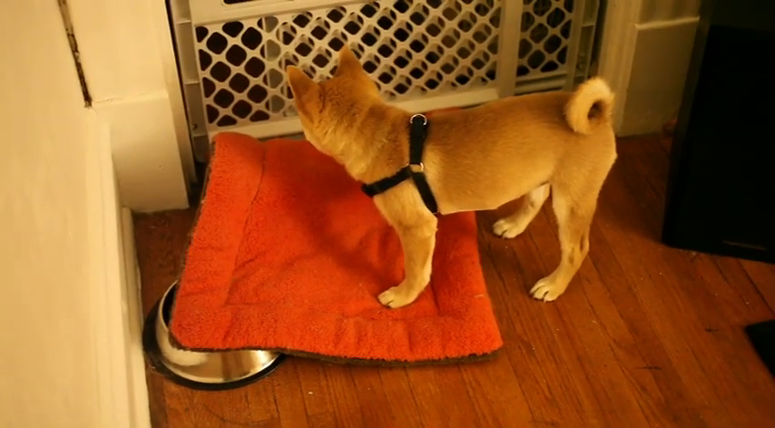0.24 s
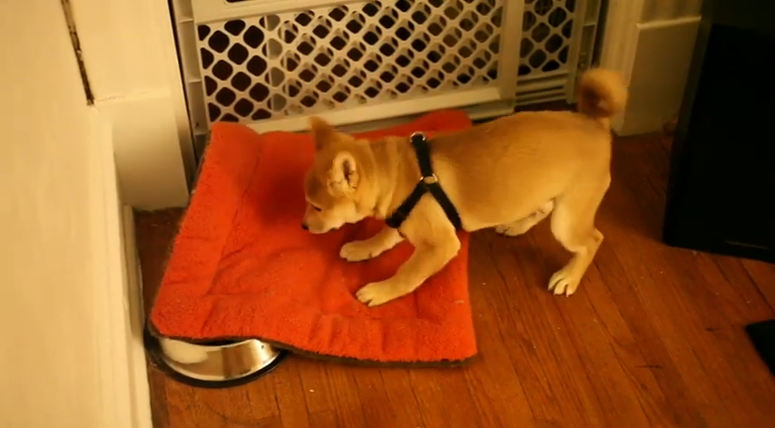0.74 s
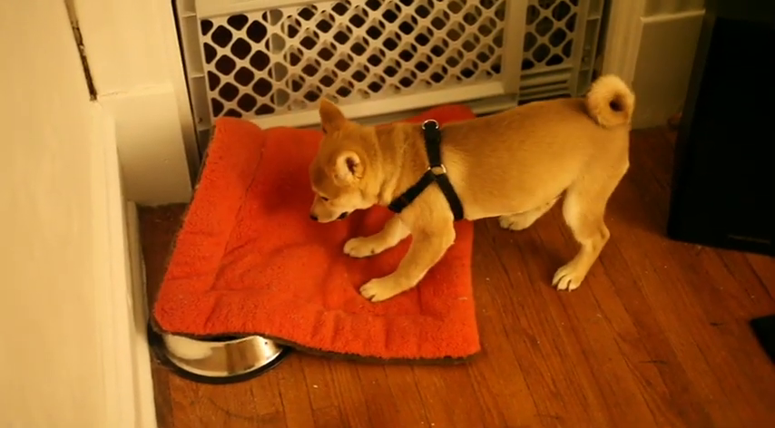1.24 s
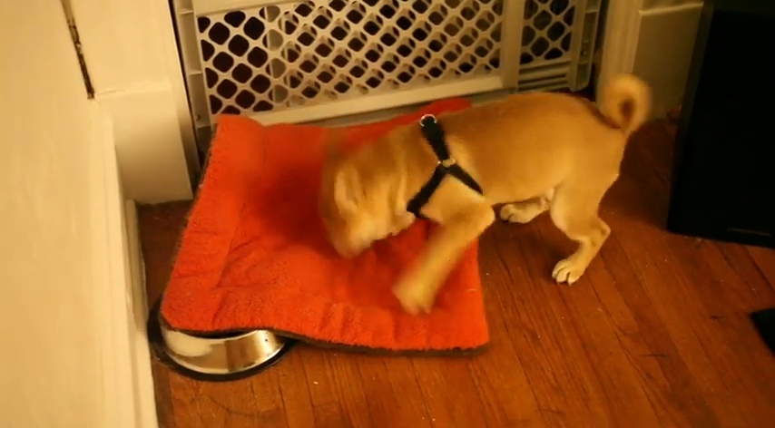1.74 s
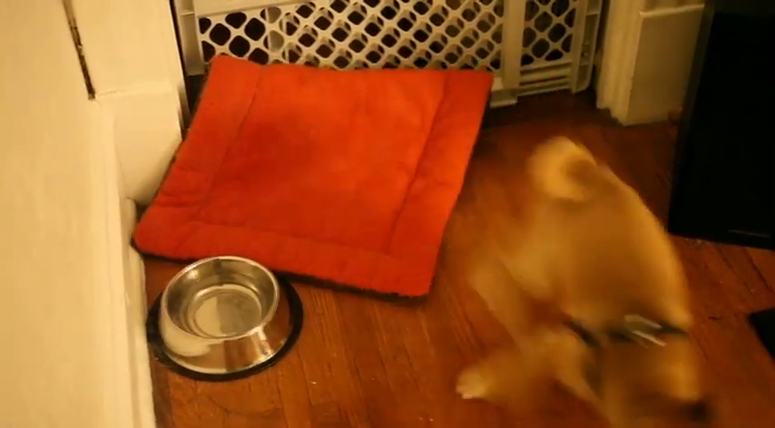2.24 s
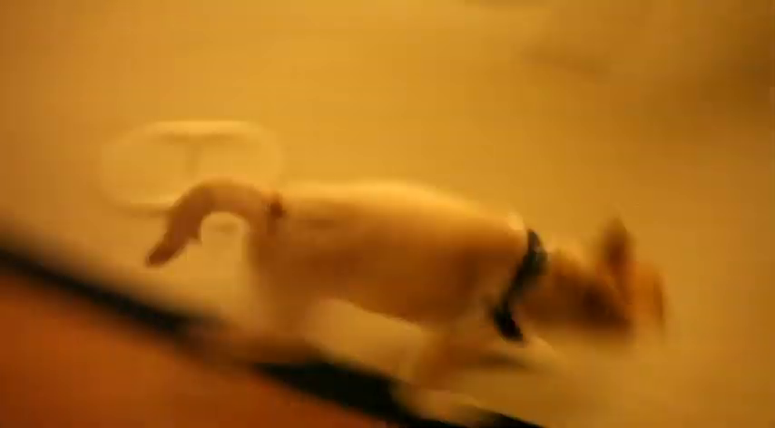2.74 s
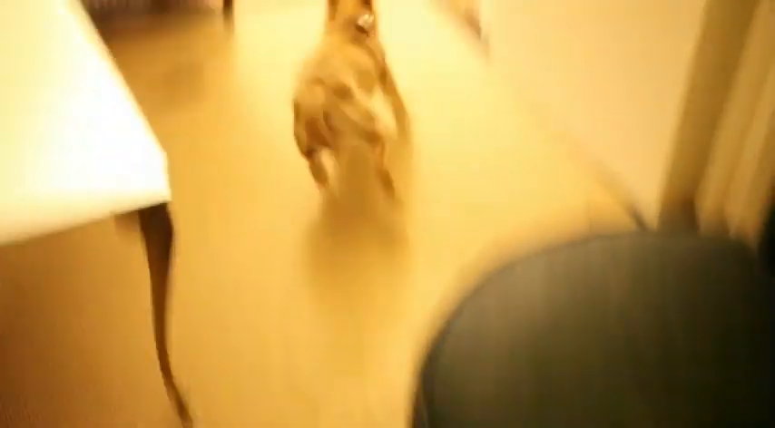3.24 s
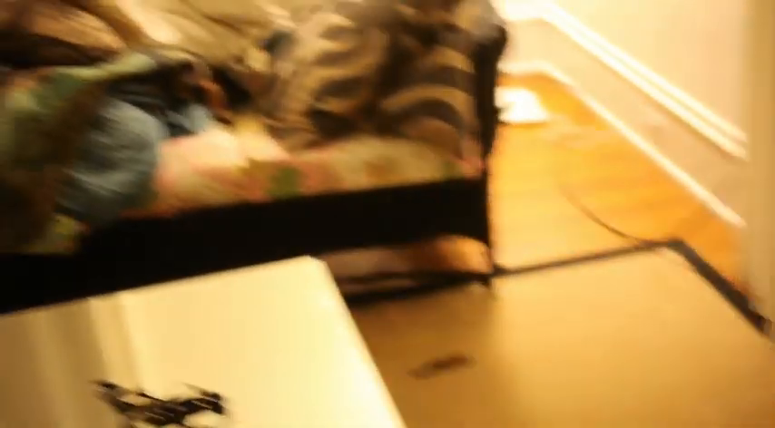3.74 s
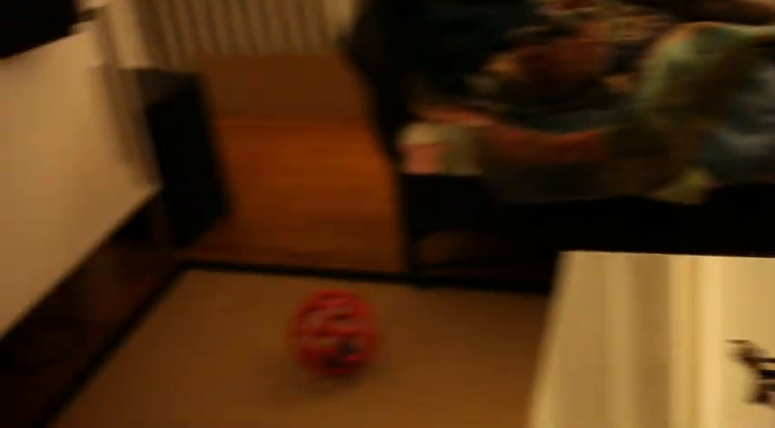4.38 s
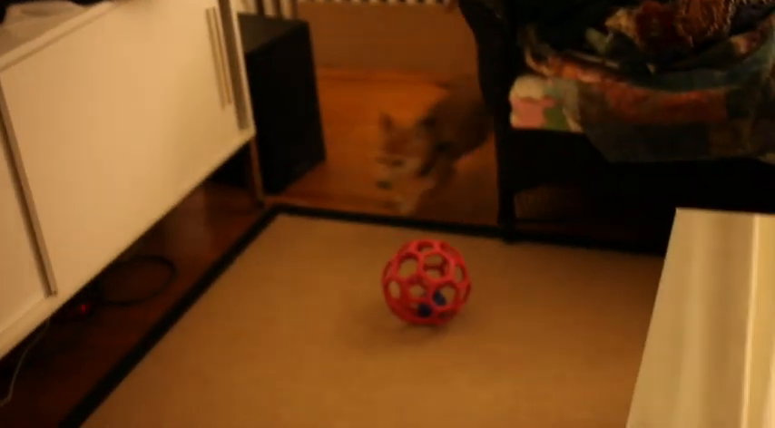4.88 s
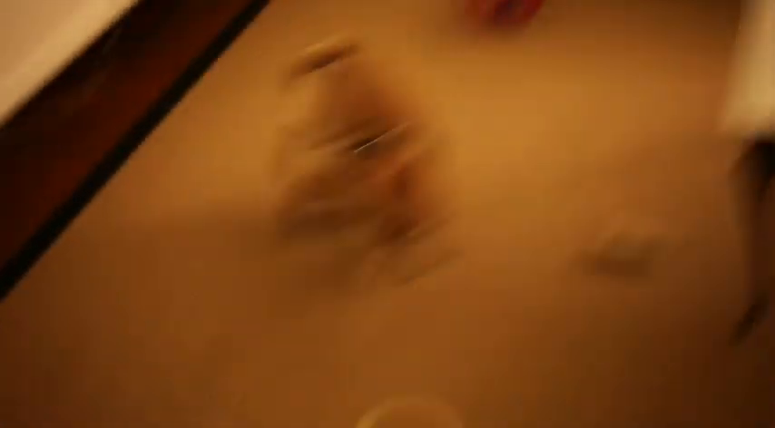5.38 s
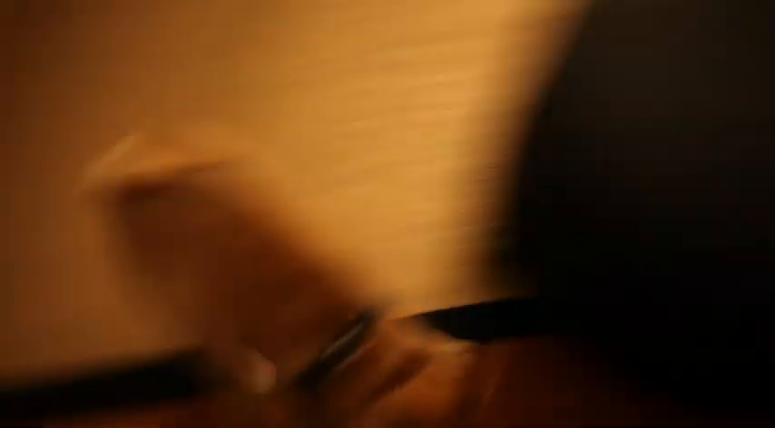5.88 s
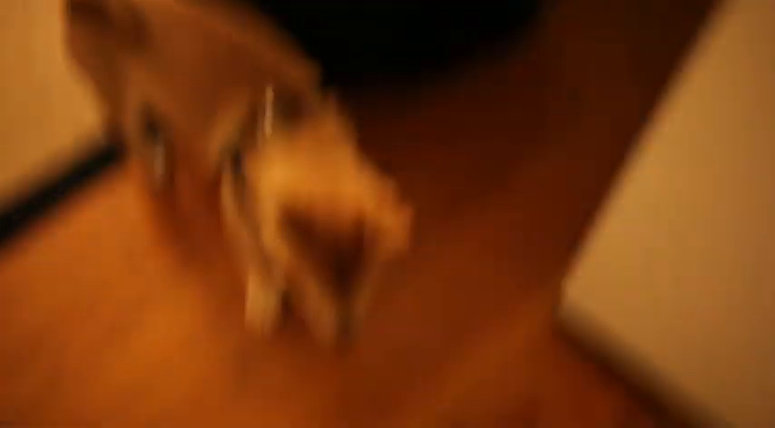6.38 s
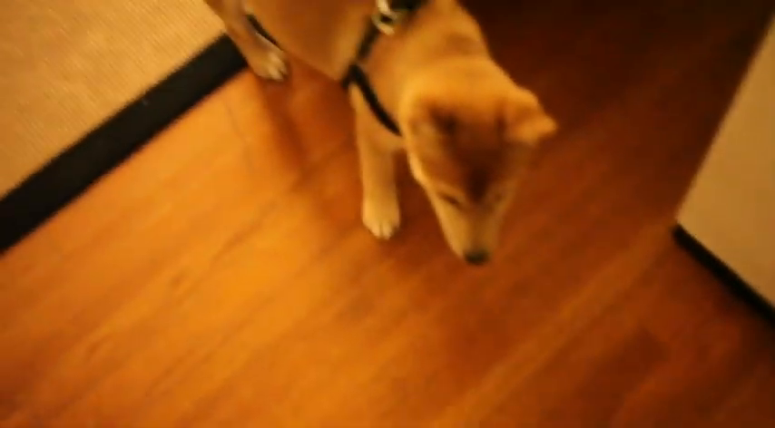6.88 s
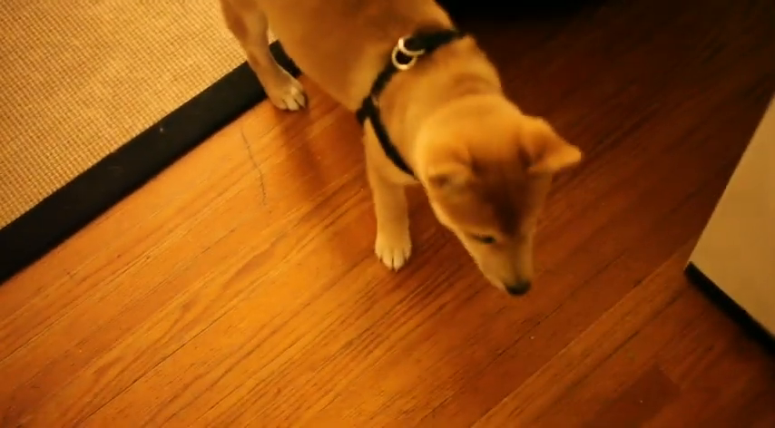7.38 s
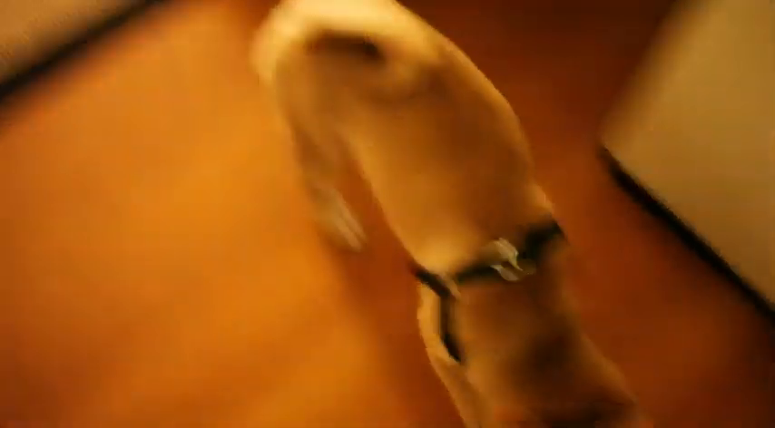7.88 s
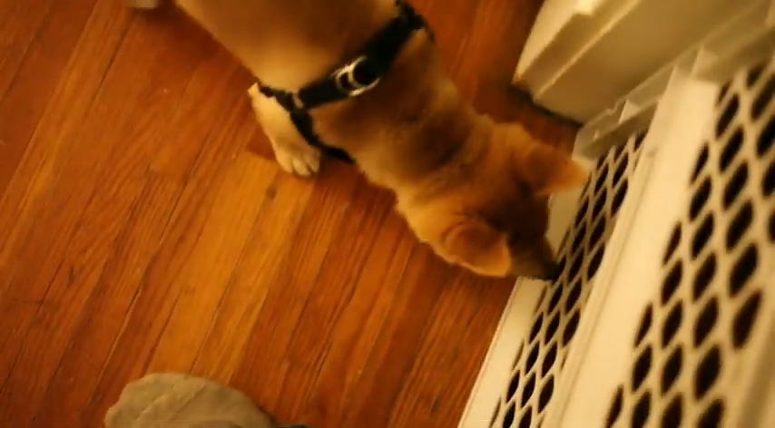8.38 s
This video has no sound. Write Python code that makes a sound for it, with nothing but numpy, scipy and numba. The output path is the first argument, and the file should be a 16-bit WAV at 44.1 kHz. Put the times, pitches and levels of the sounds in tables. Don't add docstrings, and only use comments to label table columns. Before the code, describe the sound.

In a small, lightly ringing room, a puppy gives a sharp yap with a faint muffled bowl rattle, pauses, and yaps again more roughly. It bolts: claws tick and skid, paws thud on hollow boards and drag over woven rug, swelling as it returns near the handheld microphone. After a brief lull come close scratches, a hard bump and a short snort.

```python
import sys
import numpy as np
from scipy import signal
from scipy.fft import rfft, irfft
from scipy.io import wavfile
from scipy.ndimage import uniform_filter1d
from numba import njit

SR = 44100
rng = np.random.default_rng(int(sys.argv[2]) if len(sys.argv) > 2 else 0)


def undo_db(level):
    steps = np.asarray(level, float) / 20
    return 10 ** steps


def unload_wav(signal):
    wavfile.write(
        sys.argv[1],
        SR,
        np.round(np.clip(np.atleast_2d(signal).T, -1, 1) * 32767).astype(np.int16),
    )


N = 380141
TIME = np.arange(N) / SR


def unit(x):
    return x / np.sqrt(np.mean(x ** 2))


def colour(x, points):
    hz, db = np.transpose(points)
    size = 4096
    log_hz = np.log(np.fft.rfftfreq(size, 1 / SR) + 1)
    gain_db = np.interp(log_hz, np.log(hz), db, db[0] - 20, db[-1] - 20)
    cepstrum = irfft(gain_db * np.log(10) / 20)
    cepstrum[1:size // 2] *= 2
    cepstrum[size // 2 + 1:] = 0
    response = irfft(np.exp(rfft(cepstrum)))
    return signal.fftconvolve(x, response)[:len(x)]


@njit
def svf(x, hz, width):
    y, b, l = np.empty(len(x)), 0., 0.
    for i in range(len(x)):
        g, k = np.tan(np.pi * hz[i] / SR), width / hz[i]
        v = (b + g * (x[i] - l)) / (1 + g * (g + k))
        b, l, y[i] = 2 * v - b, l + 2 * g * v, k * v
    return y


def band(x, hz, width_hz):
    return svf(x, hz + np.zeros(len(x)), float(width_hz))


def walk(rate_hz, size=N):
    hold = max(int(SR / rate_hz), 1)
    steps = np.repeat(rng.standard_normal(size // hold + 1), hold)
    return 1.6 * uniform_filter1d(uniform_filter1d(steps, hold), hold)[:size]


def grit(spread_db, size=N):
    catch = np.minimum(rng.exponential(size=size), 5)
    return rng.standard_normal(size) * undo_db(spread_db * catch)


def rise(t, attack_s):
    return np.minimum(t / attack_s, 1)


def decay(t, t60_s):
    return 1000 ** (-t / t60_s)


def add(out, s, x):
    i = int(s * SR)
    out[i:i + len(x)] += x[:len(out) - i]


# start in seconds, hold in seconds.
DUCKS = [
    (0.635, 0.24),
    (1.751, 3.36),
]
DUCK_DB, RECOVER_S, CREEP_DB_S = -24, 1.57, 1.35


def gain_db():
    ducks = [(TIME > s) * np.clip(1 - (TIME - s - hold) / RECOVER_S, 0, 1) for s, hold in DUCKS]
    return DUCK_DB * np.max(ducks, axis=0) + CREEP_DB_S * TIME


# frequency in Hz, density in dB per Hz.
HUSH = [(25, -6), (110, -5), (154, -1.5), (232, -13), (266, -8), (2150, -16), (7110, -15.5), (15200, -29)]
HUSH_DB = -63
# frequency in Hz, rms level in dB.
WHINES = [(3908, -85), (6837, -79), (9765, -79), (11719, -85.5)]


def quiet():
    hush = unit(colour(rng.standard_normal(N), HUSH)) * undo_db(HUSH_DB + gain_db())
    whine = sum(np.sqrt(2) * undo_db(db) * np.sin(2 * np.pi * hz * TIME) for hz, db in WHINES)
    first_yap_s = YAPS[0][1][0]
    return hush + whine * undo_db(-19 * (TIME > first_yap_s))


# frequency in Hz, density in dB per Hz.
RASP = [(400, -11.5), (700, -5.5), (1400, 0.5), (1890, 7.5), (2350, -1.5), (2950, 4.5), (4400, -4.5),
        (7000, -31.5)]
HISS = [(2900, -10), (4400, 5), (5300, -5.5), (6300, 5.5), (8000, -1.5), (10500, -10), (13000, -24.5),
        (16000, -42.5)]
TICK_TOP_HZ = 9000


def strike(size, tick_db, hz, knock_db, envelope, snap, air_db):
    skid = grit(4.2, size=size) * envelope
    touch = skid * np.sqrt(envelope) + snap * (np.arange(size) == 8)
    tick = band(band(touch, hz, 0.81 * hz), hz, hz) + .5 * colour(touch, HISS)
    tick = signal.lfilter(*signal.butter(2, TICK_TOP_HZ, fs=SR), tick)
    tick = tick + undo_db(air_db) * np.gradient(touch * envelope)
    knock = colour(skid, RASP) + undo_db(-15.0) * band(band(skid, 1200, 900), 660, 2700)
    return tick * undo_db(tick_db) / np.abs(tick).max() + knock * undo_db(knock_db + 2.5) / np.abs(knock).max()


# start in seconds, tick peak in dB, knock peak in dB.
BLUNT = [(3.076, -27, -17.5), (3.268, -25, -20.5), (4.385, -32, -4.5), (4.4626, -20, -15.5),
         (5.238, -41, -15.5), (5.312, -31, -14), (5.4016, -18, -24), (5.4866, -51, -17),
         (5.6071, -21.5, -16), (5.906, -9, -49), (6.187, -38, -19), (7.088, -37.5, -25.5),
         (7.738, -33, -22), (8.058, -45, -22), (8.263, -30, -21.5), (7.2404, -27, -26.5), (7.411, -21, -29),
         (8.2518, -4.5, -22)]
FIRM = [(0.601, -27, -55), (0.856, -43, -64.5), (1.9513, -17.5, -48), (2.3609, -8.5, -29),
        (2.5274, -12.5, -74.5), (2.603, -17.5, -23), (4.008, -15, -19.5), (2.9111, -34, -22),
        (4.902, -35, -24.5), (6.1905, 2, -9), (7.284, -17, -40), (7.326, -9, -23), (7.349, -11, -31),
        (8.225, -21.5, -30.5)]
SHARP = [(0.532, -36, -41), (0.587, -27, -38), (.604, -22.5, -37), (0.681, -19, -46), (.727, -24, -25),
         (1.967, -11, -24), (2.1184, -12.5, -38), (2.7172, -13.5, -20.5), (3.7968, -13.5, -52),
         (4.0692, -13.5, -33), (4.552, -8, -38), (4.5677, -3, -38), (4.811, -8.5, -49), (6.1533, -12, -48),
         (7.523, -12.5, -23.5), (7.5487, -21, -37), (7.747, -15, -23), (7.7662, -13, -43), (7.94, -20, -34),
         (7.9905, -17, -24), (8.01, -12, -32), (8.0153, -5, -26), (8.0613, 2, -8.5), (8.1887, -22, -43),
         (8.5642, -16.5, -36)]
CATCHES = [(2.28, -39, -55), (2.315, -32, -52), (2.5042, -22, -47), (2.6847, -31, -48), (2.7595, -31, -26),
           (2.9582, -27, -27.5), (3.229, -29, -35), (3.3338, -24.5, -33), (3.501, -33, -35),
           (3.606, -33, -46), (3.899, -20, -40), (4.531, -23, -28), (4.7251, -15, -43), (5.022, -34, -22),
           (5.165, -54, -63), (5.2627, -21, -19), (5.2787, -22, -28), (5.527, -19, -39), (5.561, -25, -41),
           (5.62, -32, -40), (5.662, -34, -32), (5.857, -16, -30), (7.276, -27, -38), (7.3034, -15, -32),
           (7.335, -26, -31), (7.3721, -26, -39), (7.397, -28, -32), (7.4289, -18.5, -28),
           (7.461, -31, -33), (7.48, -30, -37), (7.425, -27, -40), (7.795, -22, -34), (8.153, -35, -43),
           (8.405, -24, -38), (8.421, -28, -33), (8.491, -25, -45)]
BLUNT_HZ, FIRM_HZ, SHARP_HZ, CATCH_HZ = 3430, 4130, 6800, 5700
# start in seconds, peak in dB, pitch in Hz, rasp in dB, fade in seconds.
SKIDS = [(2.452, -18, 7260, -32.5, 0.24), (3.539, -22, 6800, -32, 0.15), (3.684, -13, 4430, -31.5, 0.3),
         (3.838, -19, 6100, -67, 0.17), (4.0046, -9.5, 4060, -54, 0.15), (4.138, -19, 6840, -30, 0.083),
         (4.2357, -12, 4200, -41, 0.095), (4.279, -13, 3700, -59, 0.44), (4.3408, -9.5, 4430, -18.5, 0.3),
         (4.4826, -10.5, 6450, -23.5, 0.14), (4.7134, -18, 7050, -27.5, 0.73),
         (5.1783, -30, 5000, -39, 0.37), (5.8285, -35, 2940, -31.5, 0.96), (6.2166, -26, 6340, -42.5, 0.57),
         (8.39, -21, 6600, -26.5, 0.23)]
NEAR_S, BACK_S, NEAR_AIR_DB = 7.26, 7.6, -22


def claws():
    out, t = np.zeros(N), TIME[:SR // 5]
    tick_envelope = rise(t, 0.00045) * (decay(t, 0.017) + 0.13 * decay(t, 0.032))
    for ring_hz, rows in [(BLUNT_HZ, BLUNT), (FIRM_HZ, FIRM), (SHARP_HZ, SHARP), (CATCH_HZ, CATCHES)]:
        for s, tick_db, knock_db in rows:
            hz = ring_hz * 2 ** (0.24 * rng.uniform(-1, 1))
            air_db = NEAR_AIR_DB - 6.2 * (s > BACK_S) if s > NEAR_S else tick_db - 12.0
            add(out, s, strike(len(t), tick_db, hz, knock_db, tick_envelope, snap=8.9, air_db=air_db))
    for s, db, hz, rasp_db, fade_s in SKIDS:
        envelope = rise(t, 0.0016) * decay(t, max(1.8 * fade_s, .02))
        add(out, s, strike(len(t), db, hz, rasp_db, envelope, snap=5.0, air_db=db - 11))
    return out


# frequency in Hz, level in dB, t60 in seconds.
BOWL = [(1017, -8.5, 0.087), (1200, -6.5, .04), (1330, -7, 0.0957), (1561, -11, .05), (1780, -8, 0.2),
        (2277, -29, .4), (2530, -12.5, .03)]
BOWL_S, BOWL_DB = .533, -39


def bowl():
    out, t = np.zeros(N), TIME[:SR // 4]
    rattle = .4 + 1.0 * walk(200, size=len(t))
    modes = sum(undo_db(db) * np.sin(2 * np.pi * hz * t) * decay(t, t60_s) for hz, db, t60_s in BOWL)
    add(out, BOWL_S, undo_db(BOWL_DB) * rattle * modes)
    return out


# start in seconds, peak in dB, pitch in Hz, t60 in seconds.
TAPS = [(.534, -38.5, 1200, .05), (2.199, -43, 746, 0.078), (3.182, -32, 860, 0.076),
        (3.352, -32, 1310, 0.08), (7.815, -26, 6500, 0.037), (8.235, -29, 6500, 0.023),
        (4.0105, -7, 4540, 0.019), (4.098, -16.5, 1600, 0.044), (4.281, -23, 3300, .04),
        (5.645, -33, 600, .05), (5.746, -40, 603, 0.042), (7.522, -20, 607, .03), (7.331, -15, 9500, .015),
        (7.287, -20, 9500, .02), (3.453, -24, 1570, 0.027), (3.529, -33, 6500, 0.033),
        (4.558, -12, 5500, .02), (5.309, -15, 2020, 0.028), (5.497, -18, 2900, .03),
        (5.763, -18.5, 3560, 0.026), (5.938, -11, 3470, 0.016), (5.977, -14, 2800, 0.033),
        (6.07, -27, 3000, .025), (6.168, -18, 4300, 0.026), (6.228, -20, 6000, .02),
        (6.251, -29, 6000, .02), (6.36, -36, 1800, .04), (6.815, -45.5, 900, .03), (6.922, -57, 690, 0.032),
        (7.088, -29, 790, 0.049), (7.241, -25.5, 950, 0.032), (7.31, -26, 1050, 0.045),
        (7.34, -38, 1000, .03), (7.385, -42, 1000, .03), (7.434, -38, 1000, 0.033), (7.475, -37, 1110, .03)]
# start in seconds, level in dB.
CHINKS = [(2.86, -65), (4.884, -49), (5.83, -42)]
CHINK_HZ, CHINK_T60_S = 14350, .14


def taps():
    out, t = np.zeros(N), TIME[:SR // 6]
    for s, db, hz, t60_s in TAPS:
        contact = grit(1.9, size=len(t)) * decay(t, t60_s)
        ring = band(band(contact, hz, .8 * hz), hz, 1.1 * hz)
        add(out, s - .001, undo_db(db) * ring / np.abs(ring).max())
    for s, db in CHINKS:
        ring = unit(band(band(rng.standard_normal(len(t)), CHINK_HZ, 500), CHINK_HZ, 1200))
        add(out, s, undo_db(db) * ring * decay(t, CHINK_T60_S))
    return out


# time in seconds, pitch in Hz, level in dB, roughness 0-1, mouth resonance in Hz.
YAPS = [
    [(.622, 663, -22.5, 0.4, 1300), (.626, 690.5, -11.5, 0.5, 1380), (.631, 683.6, -5, 0.4, 1390),
     (.635, 629, -8.5, 0.08, 1280), (.649, 693, -13, 0.03, 1370), (.657, 675, -22, 0.3, 1330),
     (.676, 612, -13, 0.7, 1600), (.69, 618, -19, 0.58, 1850), (.74, 609, -34.5, 0.5, 1900)],
    [(1.7105, 603.5, -52, 1.1, 1500), (1.734, 640, -23.5, 1.2, 1500), (1.744, 670.5, -8, 0.7, 1420),
     (1.762, 664, -12, 0.49, 1400), (1.785, 655, -12.5, 0.5, 2050), (1.81, 617, -14, 0.69, 1900),
     (1.85, 565, -28, 0.9, 1100), (1.875, 440.7, -25.5, 0.2, 865), (1.94, 439, -51, 0, 850)],
]
# slow flutter of the folds in Hz, its depth, its end in seconds; breath in dB.
FLUTTER_HZ = [240, 146.9]
FLUTTER_DEPTH = [0.33, 0.51]
FLUTTER_END_S = [.634, 1.768]
BREATH_DB = [-27, -22]
# frequency in Hz, width in Hz, level in dB.
THROAT = [(2370, 400, -29.5), (3010, 500, -10.5), (4210, 500, -11), (6600, 790, -30.5)]
# frequency in Hz, density in dB per Hz.
BREATH = [(120, -14.5), (380, 0.5), (600, -9.5), (5300, -27), (6500, -3), (8800, -11.5), (11000, -20),
          (14000, -36.5)]
HEAD_HZ = 830


def yap(rows, flutter_hz, depth, flutter_end_s, breath_db):
    s, *columns = np.transpose(rows)
    t = np.arange(s[0], s[-1], 1 / SR)
    hz, db, rough, mouth_hz = (np.interp(t, s, c) for c in columns)
    rough = np.clip(rough, 0, 1)
    phase = 2 * np.pi * np.cumsum(hz * (1 + 0.13 * rough * walk(600, size=len(t)))) / SR
    odd = np.minimum(0.17 + 2 * rough, 1)
    pulses = sum((1 if k % 2 == 0 else odd) * np.cos(k * phase) for k in range(1, 13)) / 3
    flutter_phase = 2 * np.pi * np.cumsum(flutter_hz * (1 + 0.015 * walk(60, size=len(t)))) / SR
    depth = depth * np.clip((flutter_end_s - t) / 0.012 + .5, .25, 1) * np.minimum(2 * rough, 1)
    flutter = 1 + depth * np.cos(flutter_phase)
    source = flutter * (np.sqrt(1 - rough) * pulses + 1.7 * rough * rng.standard_normal(len(t)))
    mouth = band(band(source, mouth_hz, 480), mouth_hz, 1100)
    mouth = mouth + undo_db(-4.0) * band(band(source, np.minimum(mouth_hz, 1250), 400), 1300, 1100)
    throat = sum((-1) ** k * undo_db(d) * band(source, f, w) for k, (f, w, d) in enumerate(THROAT))
    voice = mouth + (0.36 + rough) * np.minimum(mouth_hz / 1400, 1) ** 3 * throat
    voice = unit(voice) * undo_db(db)
    head = signal.butter(4, [HEAD_HZ, 4900], 'bandpass', fs=SR, output='sos')
    voice = signal.sosfilt(head, voice) + undo_db(-36) * voice
    breath = unit(colour(rng.standard_normal(len(t)), BREATH))
    return voice + undo_db(breath_db + db) * breath


# start in seconds, peak in dB, pitch in Hz.
PAWS = [(.628, -52.5, 198.2), (1.972, -24, 151), (2.366, -30, 147), (2.766, -22.5, 169), (2.881, -24, 178),
        (2.915, -17, 164), (3.025, -29.5, 158), (3.085, -39, 160), (3.148, -27.5, 163), (3.19, -32, 159),
        (3.275, -22.5, 177), (3.31, -23, 169), (3.381, -36, 180), (3.41, -27, 162), (3.456, -23, 186),
        (3.535, -19.5, 169), (3.72, -34, 166), (3.801, -32.5, 182), (4.018, -40, 197), (4.06, -29.5, 198),
        (4.133, -31, 150), (4.29, -34.5, 156), (4.373, -25.5, 164), (4.46, -26.5, 214), (4.535, -28, 133),
        (4.64, -31.5, 162), (4.733, -21.5, 209), (4.785, -31, 208), (4.845, -26, 150), (4.9, -34, 150),
        (5.016, -28, 136), (5.047, -28, 152), (5.108, -23, 191), (5.252, -23.5, 240), (5.35, -20.5, 163),
        (5.488, -21, 235), (5.55, -29, 221), (5.602, -20, 133), (5.644, -20.5, 164), (5.747, -18.5, 252),
        (5.841, -17, 158.8), (5.953, -16.5, 201.5), (6.01, -26, 196), (6.07, -31, 158), (6.19, -31, 240),
        (6.358, -36, 152), (6.683, -37, 176), (6.77, -40, 185)]
BUMPS = [(1.722, -27, 217), (7.224, -37.5, 200), (7.245, -22.5, 290), (7.277, -26, 198), (7.301, -21, 161),
         (7.341, -25, 217), (7.381, -26.5, 214), (7.422, -23, 183), (7.472, -25, 189), (7.521, -7.5, 183),
         (7.969, -23, 156), (8.056, -23, 112), (8.367, -30, 195), (8.53, -25, 166)]
BOOMS = [(2.785, -31, 204), (3.29, -38, 240), (3.345, -32.5, 210), (3.545, -32.5, 176), (7.252, -32, 235)]


def thumps(rows, t60_s, rise_s):
    out, t = np.zeros(N), TIME[:SR // 3]
    fall = (1 - np.exp(-t / rise_s)) * decay(t, t60_s)
    for s, db, hz in rows:
        shudder = unit(band(band(band(rng.standard_normal(len(t)), 310, 230), 310, 300), 310, 400))
        add(out, s - rise_s, undo_db(db - 2.5) * fall * (np.sin(2 * np.pi * hz * t) + 0.38 * shudder))
    return out


# peak time in seconds, rasp in dB, hiss above it in dB, time to fade 20 dB in seconds.
LANDINGS = [(1.972, -49, 3, 0.74), (2.193, -45, 2.5, 0.25), (2.364, -51, 24.5, 0.059),
            (2.529, -54, 23, 0.1), (2.83, -36.5, -9, 0.055), (2.911, -39.5, -0.5, 0.06),
            (3.073, -41, -7, 0.24), (3.35, -40.5, -9, 0.08), (3.272, -44, -5, 0.15), (5.833, -38, 2, 0.072),
            (5.978, -33, 10, 0.042), (3.455, -56, -12, 0.074), (3.61, -41.5, 5, 0.4),
            (3.736, -46.5, -2, 0.9), (4.014, -34, 8, 0.26), (4.246, -34, 8, 0.18), (4.81, -42, 21, 0.074),
            (4.905, -47, -7, 0.051), (5.412, -31, 2.5, 0.057), (5.486, -24.5, -9, 0.1),
            (5.759, -27.5, -19, 0.056), (7.094, -49.5, -19, 0.085), (7.724, -44, 18, 0.11),
            (8.283, -31.5, -2, 0.14), (5.24, -31, -11, 0.045), (5.264, -33, -4, 0.028),
            (5.279, -27, -3.5, 0.043), (5.374, -33, -28, 0.057), (4.554, -47, 18, 0.05)]
LEANS = [(2.712, -42, 16, 0.1), (4.577, -31.5, 16.5, 0.098), (5.313, -21, -9, 0.068),
         (5.957, -24, 9, 0.098), (4.955, -40.5, 4, 0.13), (5.2, -31, -5, 0.046), (7.565, -31.5, 6, 0.12),
         (7.633, -51, 14, 0.021), (8.002, -42, 9, 0.12)]
LAND_IN, LEAN_IN = 0.089, 0.96
# time in seconds, level in dB.
BUSTLE = [(1.9, -92), (2, -71), (2.7, -50.5), (3.1, -46.5), (3.75, -51.5), (4.4, -46), (5.1, -41.5),
          (5.8, -37), (6.2, -48), (6.5, -50), (7.2, -68), (7.3, -39), (7.68, -50.5), (8.62, -47)]
# centre in seconds, half length in seconds, dB.
LULLS = [(3.434, 0.035, -7), (3.515, .012, -1), (5.14, 0.16, -3.5), (5.46, 0.0094, -9), (5.815, .015, -16),
         (7.2, .03, -6), (7.265, 0.017, -15)]


def drag_level(column_db, bed_db):
    rows = np.array(LANDINGS + LEANS)
    swell = np.repeat([LAND_IN, LEAN_IN], [len(LANDINGS), len(LEANS)])[:, None]
    lead = (TIME - rows[:, :1]) / rows[:, 3:]
    drags = undo_db(column_db[:, None] + 20 * np.where(lead < 0, lead / swell, -lead)).sum(axis=0)
    bustle_db = np.interp(TIME, *np.transpose(BUSTLE), -150)
    lull_db = sum(db * np.exp(-((TIME - s) / half_s) ** 4) for s, half_s, db in LULLS)
    return drags + undo_db(bed_db + bustle_db + 1.5 * walk(9.1) + lull_db)


# frequency in Hz, density in dB per Hz.
RUMBLE = [(25, -9.5), (50, -18), (100, -9), (165, -6), (260, -4.5), (420, -15.5), (700, -29)]
RUMBLE_DB, BED_RASP_DB, BED_HISS_DB = -6, -7.5, 6
SNAG = .7


def scrape():
    slip = 1.3 * walk(45)
    rasp = unit(colour(grit(2.5), RASP)) * undo_db(1.6 * slip + 1.2 * walk(90))
    hiss = unit(colour(grit(3.2), HISS)) * undo_db(1.6 * slip + 1.8 * walk(150))
    low_hz = 2150 * 2 ** np.clip(.3 * walk(30), -.3, 1)
    low_snag = unit(band(band(grit(3.5), low_hz, 400), 2200, 2500)) * undo_db(2.5 * walk(70))
    high_hz = 5300 * 2 ** np.clip(.22 * walk(30), -.6, .6)
    high_snag = unit(band(band(grit(3.5), high_hz, 1100), 5300, 5000)) * undo_db(2.5 * walk(70))
    rumble = unit(colour(rng.standard_normal(N), RUMBLE)) * undo_db(4.5 * walk(18) + RUMBLE_DB)
    db, hiss_db = np.transpose(LANDINGS + LEANS)[1:3]
    low_drag = drag_level(db - 1.5, BED_RASP_DB) * (rasp + SNAG * low_snag)
    high_drag = drag_level(db + hiss_db - 7.5, BED_HISS_DB - 14.5) * (hiss + SNAG * high_snag)
    return rumble * undo_db(np.interp(TIME, *np.transpose(BUSTLE), -120)) + low_drag + high_drag


# start in seconds, hiss peak in dB, rasp in dB.
SCUFFS = [(2.066, -30.5, -65), (2.266, -28, -61), (2.668, -48, -37), (2.7, -20.5, -58), (5.745, -29, -30),
          (7.293, -18, -27), (7.326, -19, -31.5), (7.366, -17.5, -33), (7.419, -21, -32.5),
          (7.47, -19, -34), (7.726, -40, -45), (7.794, -27, -42.5), (7.962, -29, -38), (8.453, -25, -35),
          (8.509, -33, -38.5)]
SCUFF_S = 0.036


def scuffs():
    out, t = np.zeros(N), TIME[:SR // 10]
    for s, hiss_db, rasp_db in SCUFFS:
        slide = grit(1.6, size=len(t)) * undo_db(3.1 * walk(280, size=len(t)))
        slide = slide * np.sin(np.pi * rise(t, SCUFF_S)) ** 2
        hiss = colour(slide, HISS) + (NEAR_S < s < BACK_S) * undo_db(-10) * np.gradient(slide)
        rasp = colour(slide, RASP) + .5 * band(band(slide, 800, 700), 800, 1200)
        hiss = hiss * undo_db(hiss_db) / np.abs(hiss).max()
        add(out, s - .004, hiss + rasp * undo_db(rasp_db + 8.5) / np.abs(rasp).max())
    return out


# start in seconds, peak in dB, pitch in Hz.
HOLLOWS = [(3.09, -50, 660), (3.605, -40, 660), (3.72, -43, 684), (3.905, -38.5, 634), (4.095, -34.5, 707),
           (4.34, -41, 694), (4.45, -26, 677), (4.78, -41, 850), (5.015, -36, 980), (5.1, -41, 815)]


def hollows():
    out, t = np.zeros(N), TIME[:SR // 8]
    for s, db, hz in HOLLOWS:
        burst = rng.standard_normal(len(t)) * rise(t, 0.0087) * decay(t, 0.21)
        ring = band(band(burst, hz, 97), hz, 350)
        add(out, s, undo_db(db) * ring / np.abs(ring).max())
    return out


SLEW_S, SLEW_DB, SLEW_HZ, SLEW_SAG_OCT_S = 4.386, -22.5, 1600, 13.7


def slew():
    out, t = np.zeros(N), TIME[:SR // 4]
    hz = SLEW_HZ * 2 ** (-SLEW_SAG_OCT_S * t)
    ring = unit(band(band(grit(3.0, size=len(t)), hz, 980), hz, 1500))
    add(out, SLEW_S, undo_db(SLEW_DB) * ring * rise(t, 0.015) * decay(t, .5))
    return out


# time in seconds, level in dB.
SNORT = [
    (8.262, -29),
    (8.29, -19.5),
    (8.33, -25),
    (8.37, -32.5),
    (8.43, -72),
]
# frequency in Hz, width in Hz, level in dB.
NOSTRILS = [(1800, 13, 10.5), (4116, 150, 13), (4430, 41, 4.5), (6030, 56, 11.5), (7200, 71, 3.6)]


def snort():
    air = rng.standard_normal(N)
    nose = sum(undo_db(db) * band(band(air, hz, 3 * width), hz, 1350) for hz, width, db in NOSTRILS)
    return unit(nose) * undo_db(np.interp(TIME, *np.transpose(SNORT), -150, -150) + 1.0 * walk(86))


# frequency in Hz, t60 in seconds.
ROOM = [(100, 0.81), (400, 0.31), (1300, 0.42), (2000, 0.32), (4000, 0.34), (12000, 0.16)]


def room(x):
    t = TIME[:SR * 3 // 4]
    room_hz, room_t60_s = np.transpose(ROOM)
    tail = np.zeros(len(t))
    for hz in 100 * 2. ** np.arange(8):
        t60_s = np.interp(np.log(hz), np.log(room_hz), room_t60_s)
        tail += band(band(rng.standard_normal(len(t)), hz, hz), hz, hz) * decay(t, t60_s)
    tail = tail * rise(t, 0.0067)
    return signal.fftconvolve(x, tail / np.sqrt(np.sum(tail ** 2)))[:N]


# time in seconds, level in dB.
WET = [(0, 0.5), (2.5, -13.5), (4.3, -10), (6, -14.5), (7.2, -15), (7.9, -59)]


def scene():
    voice = np.zeros(N)
    for rows, *folds in zip(YAPS, FLUTTER_HZ, FLUTTER_DEPTH, FLUTTER_END_S, BREATH_DB):
        add(voice, rows[0][0], yap(rows, *folds))
    feet = claws() + bowl() + taps() + scrape() + scuffs() + hollows() + slew() + snort()
    feet += thumps(PAWS, t60_s=0.14, rise_s=0.0052)
    feet += thumps(BUMPS, t60_s=0.042, rise_s=0.0018)
    feet += thumps(BOOMS, t60_s=0.17, rise_s=0.00582)
    wet = undo_db(-14) * (voice + 0.91 * band(voice, 2100, 700))
    wet = wet + undo_db(np.interp(TIME, *np.transpose(WET))) * feet
    return (voice + feet + room(wet) + quiet())[None]


# frequency in Hz, gain in dB.
MIC = [(20, -16), (60, 0), (15750, -2), (16100, -18), (17000, -36)]


def band_limit(x):
    return signal.sosfilt(signal.butter(12, 17030, fs=SR, output="sos"), x)


def record(dry):
    mix = np.clip(colour(dry[0], MIC)[None], -1, 1)
    return band_limit(mix)


dry = scene()
out = record(dry)
unload_wav(out)
```